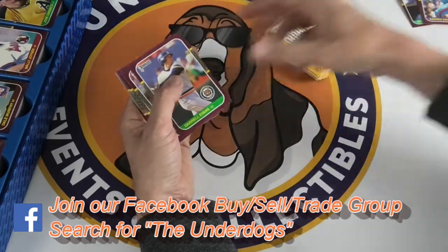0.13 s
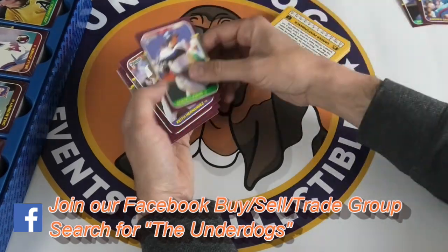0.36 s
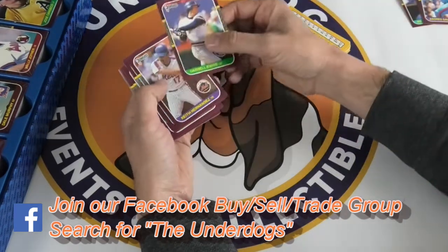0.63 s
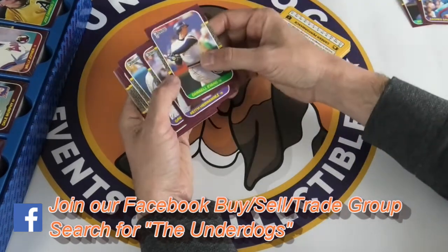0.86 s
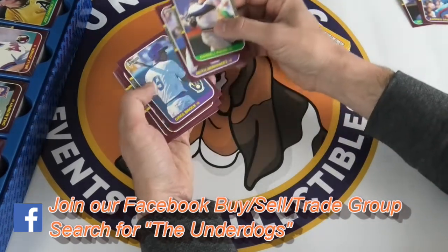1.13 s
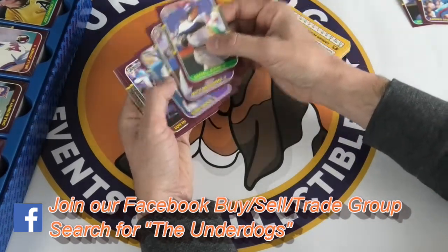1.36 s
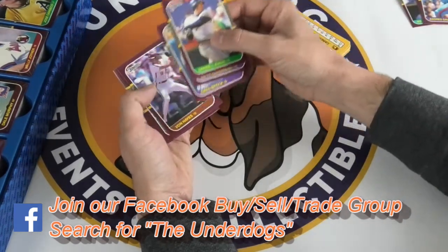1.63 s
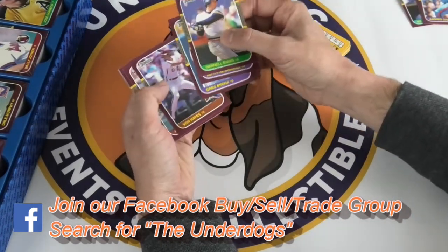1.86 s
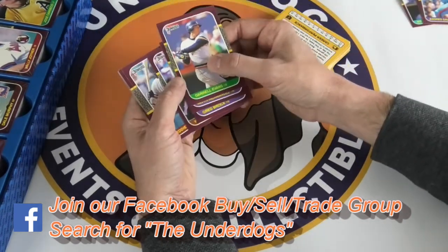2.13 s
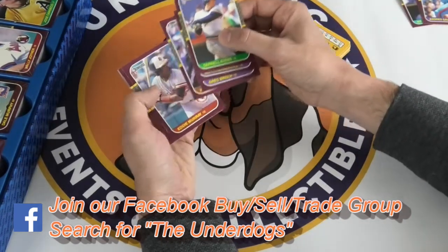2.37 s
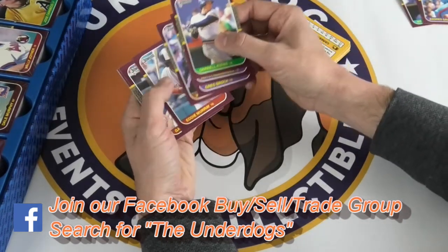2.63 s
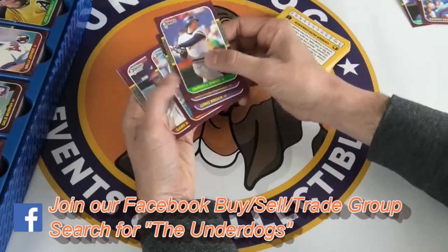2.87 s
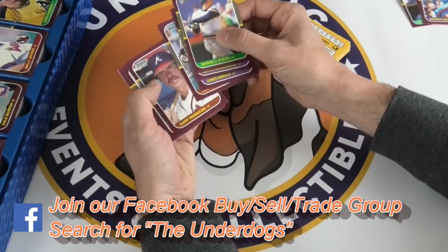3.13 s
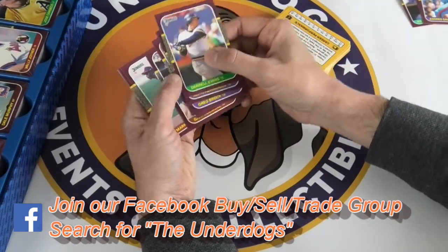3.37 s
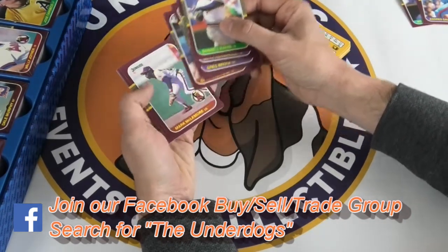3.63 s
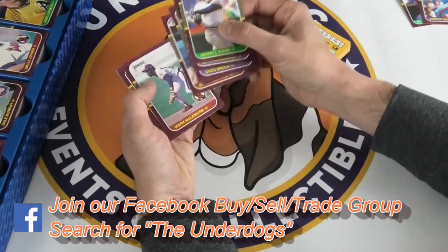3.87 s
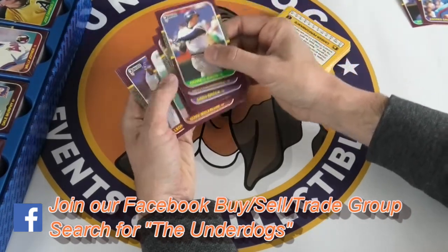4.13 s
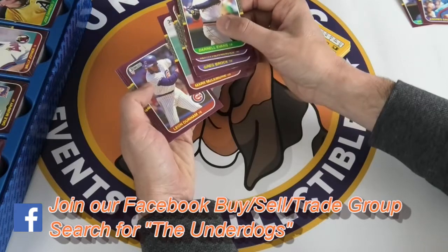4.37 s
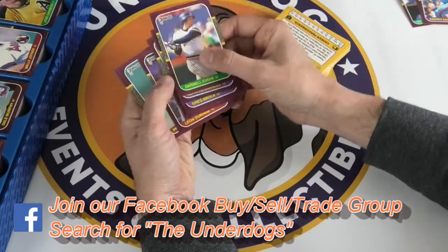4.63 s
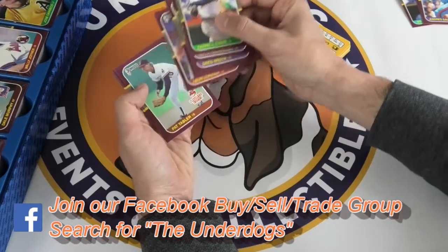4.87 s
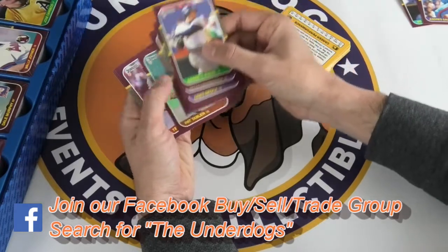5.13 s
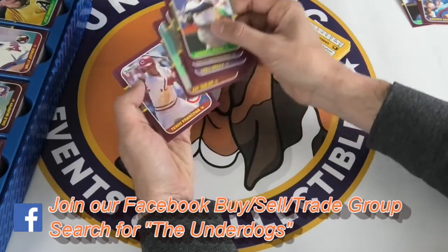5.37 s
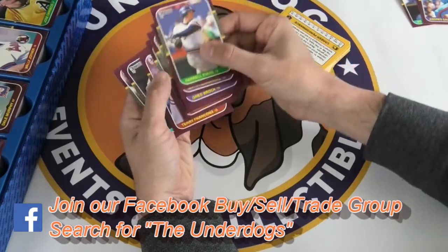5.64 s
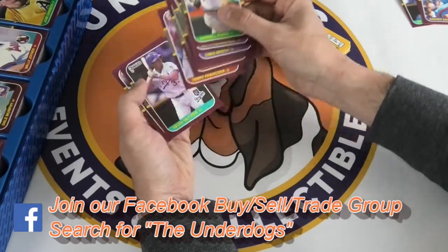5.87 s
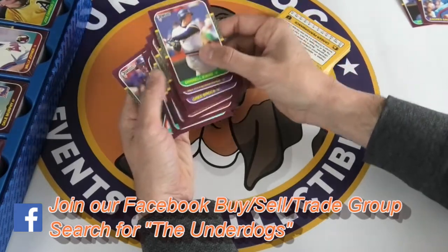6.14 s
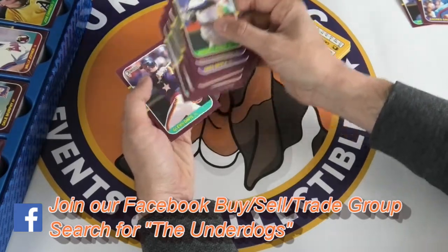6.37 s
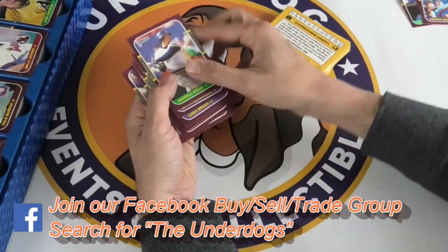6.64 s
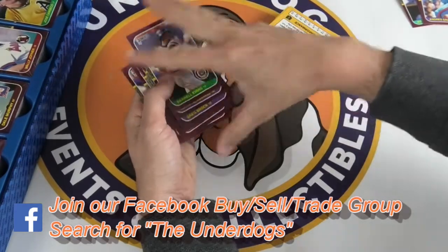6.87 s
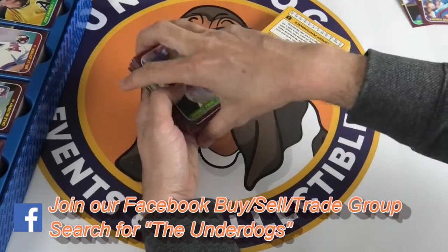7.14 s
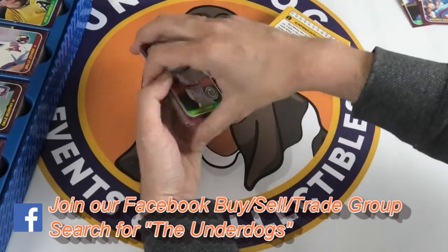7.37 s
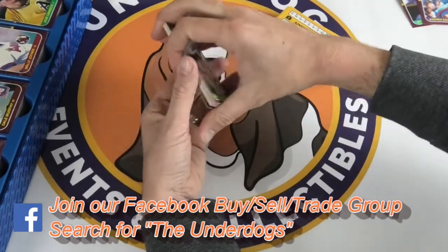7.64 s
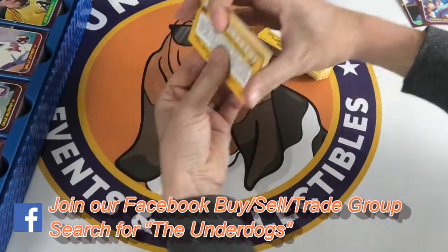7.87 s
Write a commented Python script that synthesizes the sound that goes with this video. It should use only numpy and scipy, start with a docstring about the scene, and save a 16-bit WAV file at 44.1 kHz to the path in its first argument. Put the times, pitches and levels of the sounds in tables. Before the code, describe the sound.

Close, crisp card shuffling: short hissing strokes and dull taps one after another, ending in a bright clack and knock over faint room ventilation.

```python
"""Two hands thumb glossy cardboard cards one over another, close to a stereo microphone in a small room.
Each slide is noise shaped into hiss, with the card's bending resonances rustling; cards tick and tap dully.
At the end short noise bursts ring the pack as it is squared with a clack, and the table as it is knocked.
Behind are ventilation (a noise rush, a low drone, thin fan tones) and a faint far whirr of narrow-band noise."""
import sys
import numpy as np
from scipy import signal
from scipy.fft import rfft, irfft, next_fast_len
from scipy.io import wavfile
from scipy.ndimage import uniform_filter1d, map_coordinates

SR = 44100
rng = np.random.default_rng(int(sys.argv[2]) if len(sys.argv) > 2 else 0)


def dump(signal):
    """Clip the signal to [-1, 1] and save it as 16-bit WAV at the path in sys.argv[1]."""
    limited = np.clip(np.atleast_2d(signal).T, -1, 1)
    pcm = np.round(limited * 32767).astype(np.int16)
    wavfile.write(sys.argv[1], SR, pcm)


def volts(x):
    """Linear amplitude factor 10**(x/20) for a level x in dB, scalar or array-like."""
    e = np.asarray(x, float) / 20
    return 10 ** e


N = 352800  # 8 s

# colour of the hiss: frequency_hz, shape_db
HISS_COLOUR = [(1650, -87), (2800, -9.5), (3800, -3.5), (5200, -2.5), (6900, 1), (10800, 0), (12400, -4),
               (16000, -5.5)]
# bending resonances of a card in three groups, low, middle, high: pitch_hz, width_hz, strength_db
CARD_MODES = [
    [(906, 260, 3.5), (1194, 316, 4)],
    [(1703, 445, 7.5)],
    [(2179, 254, -5), (2510, 474, 2), (3020, 1360, -5.5)],
]
# one swell of sliding hiss a row; a stroke of card over card may take two: full_s (when full level is
# reached), rise_s, hold_s, fall_s, hiss_db, rustle_db (both before the colour changes in slides)
SLIDE_SWELLS = [(0.302, .1, 0.046, .1, -54, -58), (.41, 0.079, 0.049, .17, -37, -50),
                (0.84, 0.15, .07, 0.047, -41, -51.5), (1.064, 0.071, 0.053, 0.11, -37, -48.5),
                (1.422, 0.16, 0.031, 0.047, -33.5, -47), (1.641, 0.11, 0.059, .1, -41, -50),
                (2.0, 0.46, .0, .1, -49, -53.5), (2.063, 0.098, 0.048, 0.073, -37, -50.5),
                (2.292, 0.077, 0.062, 0.2, -45, -53.5), (2.74, 0.28, .0, .05, -43.5, -54.5),
                (2.769, 0.082, 0.0094, 0.028, -35, -48.5), (2.97, 0.063, .0, 0.21, -43, -52),
                (3.18, 0.092, 0.0015, .2, -58.5, -59.5), (3.31, .12, 0.097, 0.061, -44, -53),
                (3.557, 0.054, 0.1, .11, -43.5, -51.5), (3.915, 0.19, 0.075, .05, -52.5, -56),
                (4.04, 0.099, 0.00062, 0.088, -36.5, -49), (4.21, 0.068, 0.088, 0.11, -44.5, -54.5),
                (4.531, 0.11, 0.054, 0.087, -43, -52.5), (4.645, 0.067, .0, 0.065, -41, -52.5),
                (4.71, .15, .0, 0.078, -54, -61), (4.796, 0.066, 0.1, 0.083, -42, -54.5),
                (5.055, 0.076, .06, 0.14, -42, -51.5), (5.189, .15, 0.011, 0.047, -41.5, -52),
                (5.318, 0.061, .09, 0.097, -43.5, -52), (5.62, .18, 0.0012, 0.1, -37, -49),
                (5.781, 0.065, 0.092, 0.097, -42, -53.5), (5.987, 0.051, 0.12, 0.094, -40.5, -50.5),
                (6.217, 0.036, 0.073, 0.087, -37.5, -51.5), (6.417, 0.047, 0.025, .1, -42, -49.5),
                (6.48, 0.13, .0, 0.13, -35.5, -49.5), (6.67, 0.087, 0.0015, 0.24, -56.5, -61.5),
                (6.97, .1, 0.0037, 0.22, -54, -58), (7.082, .06, 0.017, .15, -46.5, -52.5),
                (7.138, 0.022, 0.0065, 0.093, -33.5, -47), (7.31, 0.15, 0.002, 0.072, -43.5, -53),
                (7.51, 0.59, .0, .11, -52.5, -59), (7.659, 0.16, 0.0043, .1, -53.5, -57),
                (7.86, 0.54, 0.0042, .2, -53.5, -59), (7.968, 0.096, 0.0057, .02, -48.5, -56)]
# a card flexes under the thumb and its modes rustle on their own:
# full_s, rise_and_fall_s, low_db, middle_db, high_db
FLEX_ROWS = [(.51, 0.23, -49, -48, -52), (.74, 0.072, -48, -50, -62), (.81, 0.085, -48.5, -45.5, -49),
             (1.18, 0.059, -47.5, -49, -49), (1.43, 0.072, -41.5, -42.5, -44), (3.66, .1, -51, -47.5, -44),
             (3.92, .12, -45.5, -50.5, -49.5), (4.32, 0.073, -49.5, -49.5, -52),
             (4.49, 0.13, -52, -52, -53), (4.6, 0.046, -52, -57, -59), (4.86, 0.14, -46.5, -48, -44.5),
             (5.41, .08, -52.5, -53, -46), (5.9, 0.096, -48.5, -51, -47.5), (6.14, .07, -52, -47.5, -47.5),
             (6.3, 0.074, -63, -67, -44), (6.58, 0.099, -50.5, -54, -49.5), (6.93, 0.12, -55, -53.5, -65),
             (7.165, 0.076, -43.5, -43, -47), (7.31, 0.083, -52, -48, -53)]
# lowest levels, hands at rest: hiss_db, low_db, middle_db, high_db
REST_LEVELS = [-64, -78, -71, -66]


def slides():
    """Surface grit catches at random: short grains make the hiss, and the same grit shakes the card."""
    rustle_follows = 0.63  # dB of rustle per dB of hiss within a swell
    mode_db = [-1, 0, -2]  # low, middle, high mode
    mode_db_per_s = [-0.13, -0.09, 0.77]  # the held fan thickens and rings higher
    gathered_s = 6.7  # the fan is closed up again
    bright_from_db, lower_db, thinning = -39, 0.87, 0.35  # hiss level, lower-hiss gain, dB lost per dB

    # levels over time; where swells overlap, the loudest one counts
    swells = np.array(SLIDE_SWELLS)
    drops = np.array([drop(*row[:4]) for row in SLIDE_SWELLS])
    hiss_db = np.maximum((swells[:, 4:5] - drops).max(axis=0), REST_LEVELS[0])
    shake_db = (swells[:, 5:] - rustle_follows * drops).max(axis=0)
    flexes = [np.reshape(dbs, (-1, 1)) - drop(s, length, 0, length) for s, length, *dbs in FLEX_ROWS]
    flex_db = np.max(flexes, axis=0)
    t = np.arange(N) / SR
    fanned_s = t * (np.arange(N) < gathered_s * SR)
    rustle_db = []
    for db, slope, flex, rest in zip(mode_db, mode_db_per_s, flex_db, REST_LEVELS[1:]):
        shaken = shake_db + db + slope * fanned_s + 1.1 * wobble(15)
        rustle_db.append(np.maximum(np.maximum(shaken, flex), rest))

    grain_db = 0.51 * wobble(900) + 1.15 * wobble(150) + 0.83 * wobble(35)
    grit = rng.standard_normal(N) * volts(grain_db)
    grit = patchy(grit, depth_db=1.78)  # the contact patch moves, so the colour shifts within a stroke

    hiss = unit(filtered(grit, lambda hz: volts(along(HISS_COLOUR, hz))))
    lower = filtered(hiss, lambda hz: 1 / (1 + (hz / 5800) ** 8))
    # louder strokes hiss brighter, with less lower hiss
    lower_gain = volts(lower_db - thinning * np.maximum(hiss_db - bright_from_db, 0))
    hiss = hiss + (lower_gain - 1) * lower

    # the power sharpens the resonances
    rings = [unit(filtered(grit, lambda f: modes(group)(f) ** 1.305)) for group in CARD_MODES]
    levels = [hiss_db, *rustle_db]
    return sum(volts(db) * layer for db, layer in zip(levels, [hiss, *rings]))


# ticks and dull taps of the cards, levels before filtering: start_s, snap_db, low_jolt_db,
# upper_jolt_db, length_s (time to fall 20 dB)
TICK_ROWS = [(0.283, -28.5, -30, -33, 0.0044), (0.292, -33.5, -44, -38, 0.011),
             (0.322, -37, -37, -39, 0.0069), (1.282, -43, -44, -35, .005), (1.438, -23, -28, -43, 0.0074),
             (1.786, -42, -44, -44, .005), (2.057, -27, -36, -28, 0.008), (2.502, -39, -39, -44, .004),
             (2.744, -27, -38, -39, 0.0067), (3.176, -50, -38.5, -45, .012), (3.714, -42, -38, -33, 0.0053),
             (3.905, -51, -34, -35, .012), (4.468, -48, -30, -35, .008), (4.527, -31, -44, -42, .005),
             (4.845, -35, -38, -33, .006), (5.19, -33, -42, -48, 0.016), (5.975, -40, -42, -35, 0.0058),
             (6.199, -42, -38, -30, 0.0062), (6.398, -35, -36, -33, 0.01), (6.575, -34, -36, -34, 0.0043),
             (6.684, -34.5, -37, -37, 0.0052), (6.875, -56, -44, -36, .002), (6.9, -58, -24, -43, 0.012),
             (6.916, -58, -27.5, -42, 0.011), (7.016, -48, -44, -37, .004), (7.055, -36, -46, -39, 0.0085),
             (7.128, -30, -38, -31, 0.011), (7.168, -37, -30, -26, .005), (7.226, -33, -42, -36, 0.0055),
             (7.263, -34, -44, -35, 0.0087), (7.961, -30, -42, -29.5, 0.0058)]


def ticks():
    """Ticks and dull taps of the cards: some snap brightly, some only jolt the bending modes."""
    s, snap_db, low_db, upper_db, length = np.transpose(TICK_ROWS)
    snap = bursts(zip(s, snap_db, length), rise=0.1, spiky_db=3.5, blow_db=9)
    low = bursts(zip(s, low_db, length), rise=0.08, spiky_db=-0.5, blow_db=11.5)
    upper = bursts(zip(s, upper_db, length), rise=0.08, spiky_db=-0.5, blow_db=11.5)
    snap = filtered(snap, lambda hz: volts(along(HISS_COLOUR, hz)))
    low_ring = filtered(low, modes(CARD_MODES[0]))
    upper_ring = filtered(upper, modes(CARD_MODES[1] + CARD_MODES[2]))
    return snap + low_ring + upper_ring


# edges slap as the pack is squared, levels before filtering: start_s, level_db,
# length_s (body falls 20 dB in it), crispness_db (edge ring over body)
CLACK_ROWS = [(7.6872, -13.5, 0.022, -17), (7.692, -11.5, 0.013, -12.5), (7.7, -3.5, 0.0033, -3.5),
              (7.702, -13, 0.0078, -1.5), (7.7046, -12, 0.0034, -3), (7.71, -26, 0.011, -1.5)]
# resonances of the pack's body: pitch_hz, width_hz, strength_db
PACK_MODES = [(670, 390, -5), (1440, 310, -2), (2370, 470, -1), (3220, 490, 0.5), (4270, 660, 2)]
# crisp edge ring, before its response is squared: pitch_hz, width_hz, strength_db
EDGE_MODES = [(6450, 2200, -6.5), (10250, 1850, 2), (14700, 1500, -6)]


def clacks():
    """The slap of the pack's body, with a brighter ring when the edges meet square."""
    body_rows = [(s, db, length) for s, db, length, _ in CLACK_ROWS]
    edge_rows = [(s, db + crisp_db, 1.3 * length) for s, db, length, crisp_db in CLACK_ROWS]
    body = bursts(body_rows, rise=0.055, spiky_db=2.0, blow_db=9)
    edges = bursts(edge_rows, rise=0.073, spiky_db=3.5, blow_db=-1)
    return filtered(body, modes(PACK_MODES)) + filtered(edges, lambda f: modes(EDGE_MODES)(f) ** 2)


# the pack meets the table, levels before filtering: start_s, level_db, length_s (time to fall 20 dB)
KNOCK_ROWS = [(7.7733, -12.5, 0.0043), (7.778, -22, 0.031), (7.7915, -13, 0.014), (7.795, -16, 0.016),
              (7.801, -18.5, 0.014), (7.811, -22.5, 0.025), (7.825, -21.5, 0.02), (7.838, -26, 0.051)]
# resonances of the table, before the treble is softened: pitch_hz, width_hz, strength_db
TABLE_MODES = [(185, 72, -5.5), (306, 140, -2.5), (482, 144, 2), (900, 360, 0.5), (1530, 390, -0.5),
               (2510, 1600, -7.5), (4000, 1500, -8.5), (9000, 8000, -14)]


def knocks():
    """The pack knocks the table: short blows ring its resonances, with the treble softened."""
    blows = bursts(KNOCK_ROWS, rise=0.1, spiky_db=2.0, blow_db=15.5)
    return filtered(blows, lambda f: modes(TABLE_MODES)(f) / (1 + 1j * f / 3500))


# how long the room rings: frequency_hz, time_to_fall_60_db_s
ROOM_DECAY = [(200, 0.67), (1000, 0.14), (4000, 0.2), (10000, 0.2), (16000, 0.14)]


def room(x):
    """Each frequency of the room's answer dies at its own speed, differently at each side."""
    hz, t, z = signal.stft(rng.standard_normal((2, SR // 2)), SR, nperseg=256)
    decay = volts(-60 * t / along(ROOM_DECAY, hz)[:, None])
    tail = signal.istft(z * decay, SR, nperseg=256)[1]
    tail = tail / np.linalg.norm(tail[0])
    delayed = np.pad(x, (300, 0))  # samples, about 7 ms
    return signal.fftconvolve(delayed[None], tail, axes=1)[:, :N]


# colour of the air rush: frequency_hz, shape_db
AIR_COLOUR = [(15, -40), (30, -16), (60, -4), (130, -8.5), (315, -10.5), (391, -7.5), (618, -12.5),
              (707, -11), (788, -14.5), (951, -10.5), (1180, -12.5), (1970, -15.5), (2650, -22),
              (2950, -22.5), (5000, -30.5), (9000, -33), (16000, -27)]
# how alike the rush is at left and right: frequency_hz, likeness (1 = the same)
AIR_LIKENESS = [(60, 0.87), (200, 0.14), (700, 0.32), (1500, 0.66), (4000, 0.057), (7000, 0.92), (15000, 1)]
# the low drone, before its wavering: time_s, pitch_hz, level_db
DRONE_PATH = [(0, 76.9, -66.5), (1.2, 79.8, -57.5), (2.3, 77.1, -59.5), (3.6, 82, -59), (4.7, 79, -63),
              (5.2, 84, -57.5), (6.2, 87.1, -56), (7.2, 87.1, -60), (8, 82.4, -56.5)]
# thin fan tones, before a slight level waver: pitch_hz, level_db
FAN_TONES = [(369, -64), (470, -65), (1949, -67.5)]


def ventilation():
    """A wide rush of air (filtered noise), a low drone that wavers and a few thin fan tones (sines)."""
    def air(hz):
        angle = np.arccos(np.clip(along(AIR_LIKENESS, hz), -1, 1)) / 2
        return volts(along(AIR_COLOUR, hz)) * [np.cos(angle), np.sin(angle)]

    mid, side = filtered(rng.standard_normal((2, N)), air)
    rush = volts(-52.0 + 0.34 * wobble(1.43)) * unit(np.array([mid + side, mid - side]))

    hz, db = curves(DRONE_PATH)
    phase = 2 * np.pi * np.cumsum(hz + 4 * wobble(14)) / SR
    waver = volts(db + 1.3 * wobble(5.0)) * (1.02 + 0.77 * wobble(22))
    drone = waver * np.sin(phase) * volts([[-0.8], [0.8]])  # a little stronger at the right

    t = np.arange(N) / SR
    hum = 0
    for hz, db in FAN_TONES:
        phase = 2 * np.pi * hz * t + 0.71 * wobble(3.2) + np.array([[0], [0.6]])
        hum = hum + volts(db + 1.6 * wobble(4.6)) * np.sin(phase)
    return rush + drone + hum


# swells of the far whirr, before a slight waver: full_s, rise_s, hold_s, fall_s, level_db
WHIRR_SWELLS = [(1.046, 0.18, .03, .1, -51.5), (1.502, 0.25, .8, 0.11, -56), (4.45, 0.45, .15, .08, -55)]
# bands of the whirr, before their response is squared: pitch_hz, width_hz, strength_db
WHIRR_MODES = [(451, 89, -4), (637, 210, -8), (924, 50, 0)]


def whirr():
    """A faint, far whirr in narrow bands that swells now and then, partly unlike left and right."""
    rest_db = -66.5
    a, b = unit(filtered(rng.standard_normal((2, N)), lambda f: modes(WHIRR_MODES)(f) ** 2))
    swell_db = np.max([row[4] - drop(*row[:4]) for row in WHIRR_SWELLS], axis=0)
    db = np.maximum(swell_db, rest_db)
    return volts(db + 1.2 * wobble(4.4)) * np.array([a + 0.73 * b, a - 0.36 * b])


def unit(x):
    """Scales to an rms (average strength) of 1."""
    return x / np.sqrt(np.mean(x ** 2) + 1e-20)


def along(points, hz):
    """Reads a curve of (Hz, value) points on a log frequency axis."""
    f, v = np.transpose(points)
    return np.interp(np.log(hz + 1), np.log(f + 1), v)


def curves(rows):
    """One value per sample for each column after the time."""
    s, *cols = np.transpose(rows)
    return [np.interp(np.arange(N) / SR, s, c) for c in cols]


def wobble(rate):
    """A smooth random curve, rate knots a second."""
    knots = rng.standard_normal(int(N * rate / SR) + 4)
    return map_coordinates(knots, [np.arange(N) * rate / SR])


def filtered(x, response):
    """Multiplies the spectrum of x by a response, a function of frequency."""
    m = next_fast_len(N + SR // 2)
    return irfft(rfft(x, m) * response(np.fft.rfftfreq(m, 1 / SR)), m)[..., :N]


def modes(table):
    """Response of a set of resonances that ring after they are struck; signs alternate."""
    def response(f):
        return sum((-1) ** k * volts(db) * 1j * f * w / (c * c - f * f + 1j * f * w)
                   for k, (c, w, db) in enumerate(table))
    return response


def bursts(rows, rise, spiky_db, blow_db):
    """A first blow at each (s, dB, length), then crackly noise that swells and dies 20 dB a length."""
    envelope, blows, t = np.zeros(N + SR), np.zeros(N), np.arange(SR // 4) / SR
    for s, db, length in rows:
        start = round(s * SR)
        u = t / max(length, 1e-4)
        swell = 1 - np.exp(-u / max(rise, 1e-3))  # rise is in lengths
        envelope[start:][:len(t)] += volts(db - 20 * u) * swell
        blows[start] = volts(db + blow_db)
    crackle = unit(rng.standard_normal(N) * volts(spiky_db * wobble(1500)))
    return blows + envelope[:N] * crackle


def patchy(x, depth_db):
    """Random swells and dips in patches of time and frequency."""
    z = signal.stft(x, nperseg=256)[2]
    field = uniform_filter1d(rng.standard_normal(z.shape), size=7, axis=0)
    field = uniform_filter1d(field, size=12, axis=1)
    return unit(signal.istft(z * volts(depth_db * unit(field)), nperseg=256)[1][:N])


def drop(s, rise, hold, fall):
    """dB below full level of a swell: rise, hold, fall, with rounded shoulders."""
    swing_db, rounded = 25, 1.154  # gained in a rise or lost in a fall; power rounding the shoulders
    t = np.arange(N) / SR
    before = (s - t) / max(rise, 0.005)
    after = (t - s - max(hold, 0)) / max(fall, 0.005)
    return swing_db * np.maximum(np.maximum(before, after), 0) ** rounded


# where the cards sit: frequency_hz, left_over_right_db
CARD_SIDE = [(60, -1.0), (180, -1.5), (550, 5.5), (1650, 3.5), (4970, 2.5), (15000, 1.5)]
# where the clack sits: frequency_hz, left_over_right_db
CLACK_SIDE = [(200, -2), (550, -7), (1650, -12.5), (5000, -3), (15000, -2)]


def scene():
    """Cards mostly to the left, the squaring clack to the right, all in the room with the background."""
    def placed(x, pan):
        return filtered(x, lambda hz: volts(np.outer([0.5, -0.5], along(pan, hz))))

    cards, clack, knock = slides() + ticks(), clacks(), knocks()
    wet = room(volts(-8.5) * cards + volts(-4.0) * clack + volts(-8) * knock)
    # close ports: the treble reaches both alike
    side = filtered((wet[0] - wet[1]) / 2, lambda hz: 1.14 / (1 + (hz / 4500) ** 4))
    direct = placed(cards, CARD_SIDE) + placed(clack, CLACK_SIDE) + knock * volts([[1.1], [-1.1]])
    return direct + wet.mean(0) + side * [[1], [-1]] + ventilation() + whirr()


def roll_off(x):
    """The treble ends steeply here."""
    return signal.sosfilt(signal.butter(12, 16500, fs=SR, output="sos"), x)


def record(dry):
    """Finishes the mix with a sharp band limit: nothing from 15750 Hz up passes it."""
    limited = filtered(dry, lambda hz: hz < 15750)
    return roll_off(limited)


dry = scene()
out = record(dry)
dump(out)
```